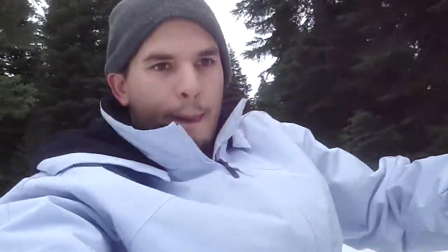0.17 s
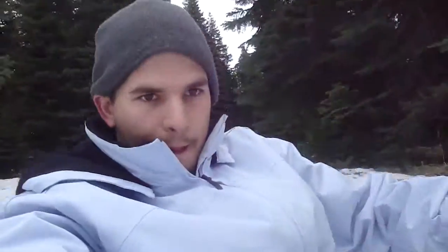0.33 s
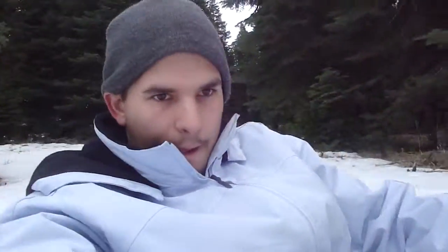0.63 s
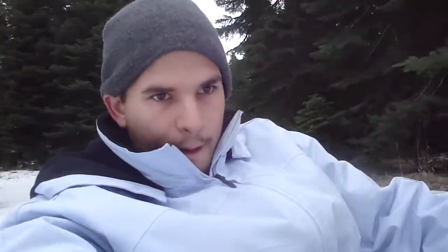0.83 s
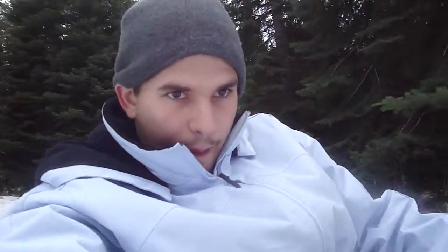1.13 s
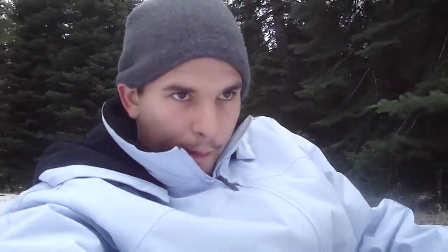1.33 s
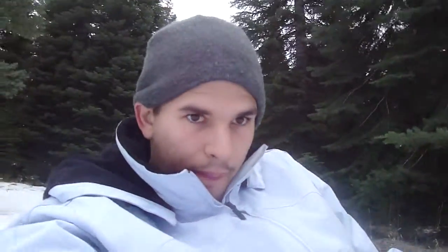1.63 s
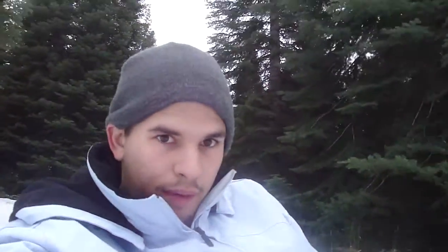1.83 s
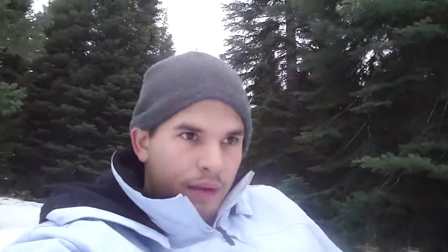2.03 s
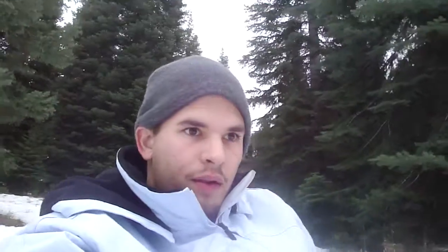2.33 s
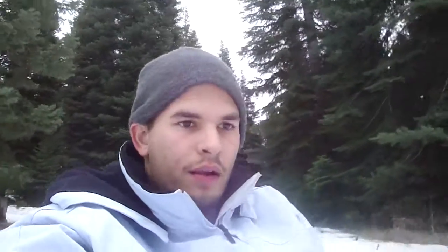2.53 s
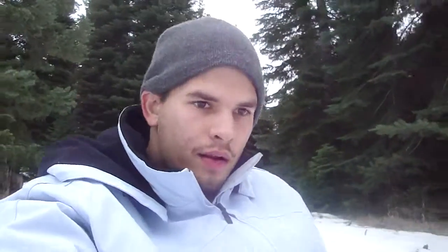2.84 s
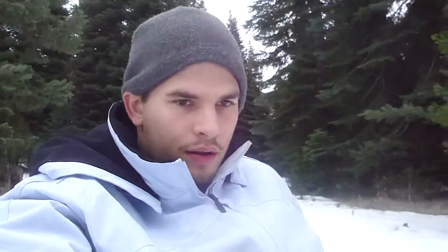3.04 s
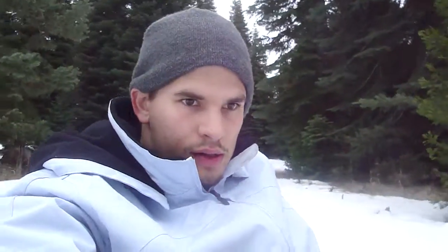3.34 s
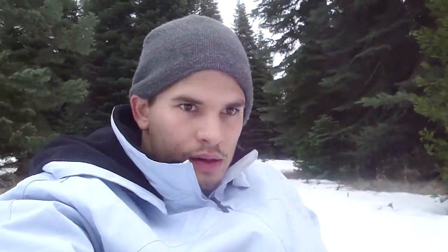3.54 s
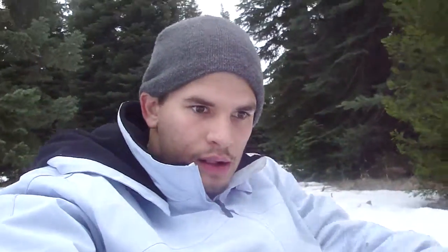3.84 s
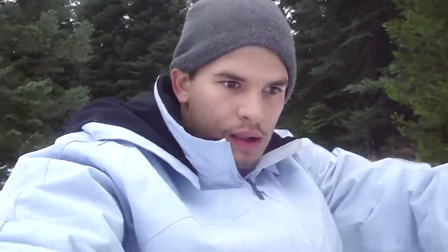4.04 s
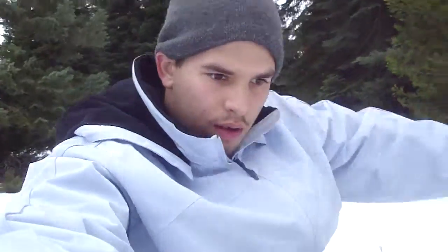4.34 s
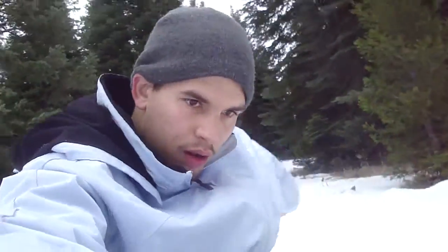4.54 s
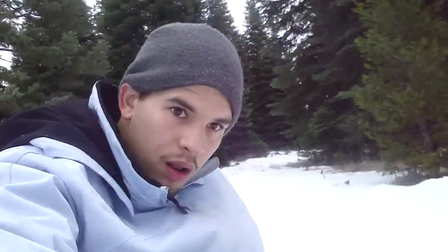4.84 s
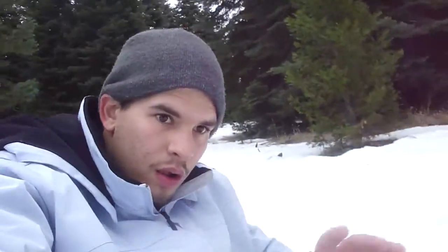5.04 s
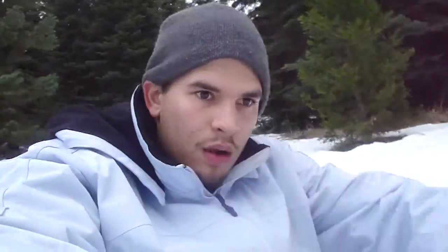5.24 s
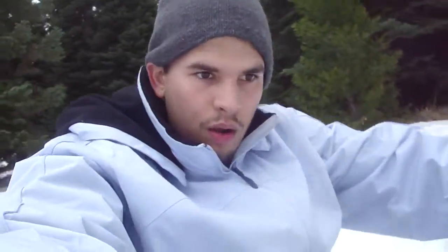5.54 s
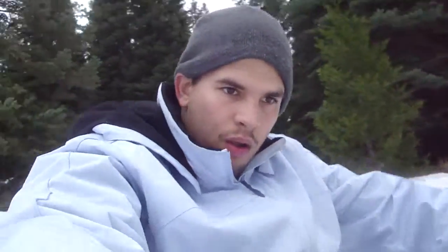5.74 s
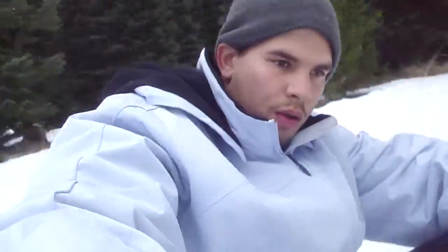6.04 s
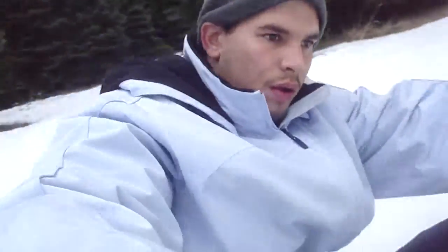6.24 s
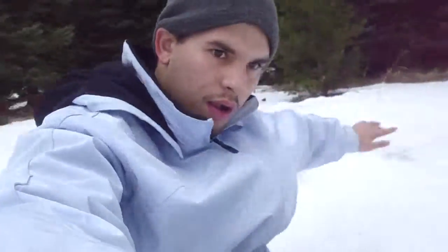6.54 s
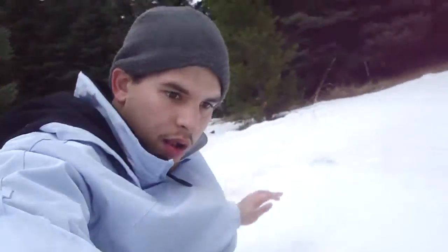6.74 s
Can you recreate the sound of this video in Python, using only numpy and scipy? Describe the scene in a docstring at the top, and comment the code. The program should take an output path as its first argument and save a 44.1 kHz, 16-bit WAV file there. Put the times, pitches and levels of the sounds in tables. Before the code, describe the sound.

A plastic sled runs down a snowy forest track, heard by a small hand-held microphone on board, close, dry and mono. At 0 s the rush is already strong: grainy scrape, hollow hull drone, hissing spray and a heavy wind buffet that eases by 0.5 s. From 0.4 to 1.0 s dull thuds knock in quick succession, hardest near 0.8 and 0.9; another cluster comes at 1.5-1.95. Around 2.2-2.7 the hull crunches lightly, wind lifts and the scrape becomes brighter until about 3.3, then softens. At 4.1-4.25 sharp crunches bite, followed by a hissier surge near 4.5. A firm bump lands at 5.4. From 5.6 the spray brightens unevenly, with crunches and small thuds, peaking in a crisp hiss around 6.2-6.45. Afterwards the scrape turns darker and wind fades, the slide still continuing at 6.87.

```python
"""A plastic sled runs down a snowy forest track, heard by a small hand-held mono microphone on board.
Hull drone, scrape over crushed snow and edge spray: random clicks, band-filtered and coloured.
Head wind: low-frequency click noise in lumpy gusts. Ruts: smooth pushes on the capsule.
Crunches: brief level and tilt changes where the hull bites crust. A limiter ducks the highest peaks."""
import sys
import numpy as np
from scipy import signal
from scipy.fft import rfft, irfft
from scipy.io import wavfile

SR = 44100
rng = np.random.default_rng(int(sys.argv[2]) if len(sys.argv) > 2 else 0)


def to_wav(sig):
    """Store sig (one row per channel, or 1-D mono) as 16-bit WAV at the path in sys.argv[1].

    Samples outside -1..1 are clipped; the rate is SR.
    """
    pcm = np.clip(np.atleast_2d(sig), -1, 1) * 32767
    pcm = np.round(pcm).astype(np.int16)
    wavfile.write(sys.argv[1], SR, pcm.T)  # frames by channels


N = 303170


def from_db(db):
    """Gain of a level in dB."""
    return 10 ** (np.asarray(db) / 20)


def rms_one(x):
    """Scaled to rms 1."""
    return x / np.sqrt(np.mean(x ** 2) + 1e-20)


def in_time(rows):
    """Table columns, interpolated at every sample."""
    s, *columns = np.transpose(rows)
    return [np.interp(np.arange(N) / SR, s, column) for column in columns]


def drift(rate_hz):
    """Slow noise of rms 1: white noise through two equal low-pass poles at rate_hz."""
    step = 40  # samples per slow point
    pole = np.exp(-2 * np.pi * rate_hz * step / SR)
    white = rng.standard_normal(N // step + 2002)
    slow = signal.lfilter([1], [1, -2 * pole, pole * pole], white)[2000:]  # drop the settling
    return np.interp(np.arange(N) / step, np.arange(len(slow)), rms_one(slow))


def crystals(per_s, spread_db):
    """Snow crystals break at random moments, with uneven strength and either sign."""
    size_db = spread_db * np.minimum(rng.exponential(1, N), 5)
    sizes = from_db(size_db) * rng.standard_normal(N)
    return rms_one(sizes * (rng.random(N) < per_s / SR))


RING_WIDTH_OCTAVES = 0.2


def rush(spectrum, surge, per_s, spread_db, surge_db, patchy_db,
         tilt_db=0, pivot_hz=1000, ring_hz=1000, ring_db=0):
    """Random clicks in third-octave bands; all share the surge and each flickers on its own."""
    hz_points, db_points = np.transpose(spectrum)
    span_octaves = np.log2(hz_points[-1] / hz_points[0])
    edges_hz = hz_points[0] * 2 ** np.arange(0, span_octaves + .4, 1 / 3)
    clicks = [crystals(per_s, spread_db) for _ in range(2)]  # neighbouring bands differ
    out = 0
    for k, (low_hz, high_hz) in enumerate(zip(edges_hz, edges_hz[1:])):
        band_pass = signal.butter(2, [low_hz, high_hz], "band", fs=SR, output="sos")
        band = signal.sosfilt(band_pass, clicks[k % 2])
        flicker_db = surge_db * surge + patchy_db * drift(7.6)
        tilt_octaves = np.clip(np.log2(low_hz / pivot_hz), -1, 1)  # flat beyond one octave
        ring_octaves = np.log2(np.sqrt(low_hz * high_hz) / ring_hz)
        ring_gain_db = ring_db * np.exp(-.5 * (ring_octaves / RING_WIDTH_OCTAVES) ** 2)
        out = out + band * from_db(flicker_db + tilt_db * tilt_octaves + ring_gain_db)
    hz = np.maximum(np.arange(N // 2 + 1) * SR / N, 1)
    colour = from_db(np.interp(np.log(hz), np.log(hz_points), db_points))
    return rms_one(irfft(rfft(out) * colour, N))


# hull rings, shifting as it flexes: t/s, low ring f/Hz, low ring boost/dB,
# high ring f/Hz, high ring boost/dB
HULL_RINGS = [(0.0, 300, 4, 1180, 0.5), (0.6, 308, 4, 1100, 4), (0.95, 430, 8.5, 1250, -1),
              (1.5, 430, 1.5, 1300, 0.5), (2.1, 340, 1, 910, 0.5), (2.7, 356, 4.5, 870, 4.5),
              (3.3, 348, -1.5, 810, 5.5), (3.9, 273, 4, 890, 3.5), (4.6, 245, 5, 910, 3.5),
              (5.3, 238, -0.5, 1000, 3), (5.9, 420, 6, 850, 2), (6.4, 300, -4, 800, 4.5),
              (6.87, 400, 2, 800, 0)]


def hull_rings():
    """Two broad hull resonances: frequency and boost in time."""
    return in_time(HULL_RINGS)


# drone colour: f/Hz, level/(dB per Hz)
DRONE_SPECTRUM = [(40, -72), (100, -13.5), (200, -1.5), (290, -2), (400, -3.5), (650, -9.5), (1100, -13)]


def drone(surge):
    """Hull vibration, boosted at the low ring; the shared surge has zero weight."""
    ring_hz, ring_db, _, _ = hull_rings()
    return rush(DRONE_SPECTRUM, surge, 9000, spread_db=1.0, surge_db=0.0, patchy_db=1.0,
                ring_hz=ring_hz, ring_db=ring_db)


# scrape colour: f/Hz, level/(dB per Hz)
SCRAPE_SPECTRUM = [(300, -5), (550, -1), (680, -3), (850, -2.5), (1200, -2), (1650, -2), (2000, -5.5),
                   (2300, -8.5), (2700, -13.5), (3500, -17.5)]


def scrape(surge, tilt_db):
    """Hull over crushed snow: clumps make the bands flicker; boosted at the high ring."""
    _, _, ring_hz, ring_db = hull_rings()
    return rush(SCRAPE_SPECTRUM, surge, 15000, spread_db=1.5, surge_db=-0.09, patchy_db=0.8,
                tilt_db=tilt_db, ring_hz=ring_hz, ring_db=ring_db)


# spray colour: f/Hz, level/(dB per Hz)
SPRAY_SPECTRUM = [(1200, -17), (2200, -3), (2800, -2.5), (3400, -1), (4100, -1.5), (4900, .7), (5700, -1),
                  (6500, -2.5), (7800, -4.4), (9200, -9.3), (10700, -17.5), (13000, -27), (15600, -31)]


def spray(surge, tilt_db):
    """Snow thrown off the hull edges: dense clicks that hiss and follow the surge."""
    return rush(SPRAY_SPECTRUM, surge, 30000, spread_db=1.2, surge_db=.5, patchy_db=.6,
                tilt_db=tilt_db, pivot_hz=4500)


# the ride: t/s, drone level/dB, scrape level/dB, spray level/dB,
# scrape tilt/(dB per octave), spray tilt/(dB per octave)
RIDE_LEVELS = [(0.0, -20.5, -15, -22, -2.5, -2), (0.2, -25.5, -17.5, -25.5, -0.5, -3),
               (0.65, -25, -19.5, -26.5, -3, -6.5), (0.8, -28, -19.5, -28.5, -1, -4.5),
               (0.94, -26, -19.5, -29, -1, -5), (1.13, -24, -19, -30, -1.5, -4),
               (1.5, -24.5, -17.5, -28, -1, -3.5), (2.03, -22.5, -18, -26.5, 0.5, -5),
               (2.18, -22, -16, -25.5, -1, -4), (2.45, -28, -17.5, -27, -0.5, -5),
               (2.72, -25.5, -17.5, -23.5, 3, -3), (3.08, -22.5, -17.5, -23.5, 2.5, -3.5),
               (3.52, -24.5, -20, -28, 0.5, -3.5), (3.71, -25, -20, -26, -1, -3.5),
               (3.88, -25, -23, -27.5, -3, -4), (4.0, -23.5, -19, -26, -1, -2.5),
               (4.18, -23.5, -22, -26.5, -2.5, -3), (4.25, -21.5, -18, -22.5, 0.5, -2),
               (4.38, -24.5, -19, -22, 2.5, -1), (4.51, -27, -16.5, -20, -0.5, -0.5),
               (4.63, -26.5, -18, -22.5, -2, -2), (4.75, -24, -18, -24.5, -1, -4.5),
               (4.92, -26, -19.5, -26, -1.5, -3), (5.2, -21, -19, -25, -2.5, -4.5),
               (5.45, -21.5, -21.5, -25, 2, 0.5), (5.56, -23, -20.5, -24.5, -1, 0),
               (5.63, -22, -19, -23, 1.5, 1.5), (5.72, -24, -20, -21.5, 2.5, 0),
               (5.85, -29.5, -18, -24.5, 0, -1), (6.05, -22.5, -19.5, -23.5, 0.5, -1),
               (6.14, -23.5, -22, -22, -2, -0.5), (6.2, -20.5, -23.5, -21, 3, -1),
               (6.28, -26.5, -23.5, -20, 1, -2.5), (6.37, -23, -23.5, -18, 5, 0.5),
               (6.43, -29, -24.5, -19.5, 1, -0.5), (6.5, -26, -23, -21, 1, -3),
               (6.62, -23.5, -19.5, -26.5, 0, -3.5), (6.87, -28, -18, -24.5, -3.5, -3)]
CRUNCH_SHARE_IN_SPRAY = .62  # of the swell in dB


def sled():
    """Drone, scrape and spray at ride levels; crunches move scrape and spray."""
    drone_db, scrape_db, spray_db, scrape_tilt_db, spray_tilt_db = in_time(RIDE_LEVELS)
    surge = drift(9.2)
    bite_db, bite_tilt_db = crunches()
    hull_drone = from_db(drone_db) * drone(surge)
    snow_scrape = from_db(scrape_db + bite_db) * scrape(surge, scrape_tilt_db + bite_tilt_db)
    edge_spray = from_db(spray_db + CRUNCH_SHARE_IN_SPRAY * bite_db) * spray(surge, spray_tilt_db)
    return hull_drone + snow_scrape + edge_spray


# strength of head wind and small jolts: t/s, offset/dB
GUST_STRENGTH = [(0, 11.5), (0.5, -5), (1.1, -2.5), (2.0, -1), (2.5, 4), (3.0, 2.5), (3.6, -1), (4.2, 1),
                 (4.7, 4), (5.3, 1), (5.8, 1), (6.3, -1), (6.6, -5), (6.87, -16)]


def gust_db():
    """Offset of head wind and small jolts in time, dB."""
    return in_time(GUST_STRENGTH)[0]


# wind colour: f/Hz, level/(dB per Hz)
WIND_SPECTRUM = [(20, 16), (50, -32), (100, -12), (180, -20.5)]
WIND_DB = -24.5  # at zero gust offset


def wind():
    """Head wind rumbles on the microphone port in lumpy gusts."""
    rumble = rush(WIND_SPECTRUM, drift(21), 4000, spread_db=3.5, surge_db=0.5, patchy_db=2.0)
    return from_db(WIND_DB + gust_db()) * rumble


# ruts felt at the microphone: t/s, push level/dB before the limiter
RUT_JOLTS = [(0.398, -6), (0.44, -4), (0.472, -6), (0.504, -8), (0.575, -9), (0.606, -4), (0.638, -6),
             (0.69, -1), (0.734, -5), (0.775, -3.5), (0.83, 1), (0.928, 1), (0.992, -9), (1.475, -9),
             (1.555, -6), (1.62, -8), (1.67, -7), (1.765, -1), (1.798, .5), (1.83, -4), (1.899, -7),
             (1.948, -5), (2.5, -5), (2.554, -9), (3.737, -7), (3.799, -9), (4.04, -8), (4.151, -7),
             (5.4, -2.5), (5.533, -6), (5.912, -12), (5.982, -8), (6.034, -7), (6.147, -4), (6.64, -10)]
# sharp, usual and blunt pushes: share of JOLT_WIDTH_S
JOLT_WIDTH_SHARES = (.8, 1, 1.2)
JOLT_WIDTH_S = .00105  # Gaussian sigma
SMALL_JOLTS_PER_S, SMALL_JOLT_DB, SMALL_JOLT_SPREAD_DB = 45, -20.5, 1.8


def jolts():
    """Each rut is one Gaussian push on the capsule, width by chance; small ones come at random."""
    small = rng.random(N) < SMALL_JOLTS_PER_S / SR
    small_db = SMALL_JOLT_DB + gust_db() + SMALL_JOLT_SPREAD_DB * rng.standard_normal(N)
    pushes = small * from_db(small_db)
    for s, db in RUT_JOLTS:
        pushes[round(s * SR)] = from_db(db)
    t = np.arange(-400, 401) / SR
    dealt = rng.integers(0, len(JOLT_WIDTH_SHARES), N)
    out = np.zeros(N)
    for k, share in enumerate(JOLT_WIDTH_SHARES):
        shape = np.exp(-.5 * (t / (share * JOLT_WIDTH_S)) ** 2)
        out += np.convolve(pushes * (dealt == k), shape, "same")
    return out


# hull bites into crusty snow: t/s, swell level/dB, added scrape tilt/(dB per octave)
CRUST_BITES = [(0.13, 3, 1), (0.21, 2.5, 0.5), (0.255, -1, 0), (0.605, 2.5, -2), (1.145, 2, 1.5),
               (2.15, -0.5, -0.5), (2.24, 0.5, -1.5), (2.31, 1, 0.5), (2.44, 2.5, -1.5), (2.65, 3, -1),
               (3.33, 1, -2), (3.751, 1.5, -1), (3.95, 2, -1), (4.105, 5.5, 2.5), (4.15, 4, 0),
               (4.215, 3.5, 0), (4.255, 0.5, 2.5), (4.32, 0, -3), (4.42, 2.5, 0.5), (4.66, 0.5, 2),
               (4.725, 2.5, 2), (4.855, 2, 1), (5.64, 1.5, 0.5), (5.71, 2, -1), (5.985, 1.5, -2),
               (6.105, 2, 1), (6.15, 3.5, 2), (6.245, 5, -2), (6.3, 2.5, -1), (6.39, 2, 1), (6.77, 1.5, 1)]
CRUNCH_WIDTH_S = .015  # Gaussian sigma


def crunches():
    """Each bite is a brief smooth change of level/dB and scrape tilt/(dB per octave)."""
    t = np.arange(N) / SR
    out = np.zeros((2, N))
    for s, db, tilt_db in CRUST_BITES:
        swell = np.exp(-.5 * ((t - s) / CRUNCH_WIDTH_S) ** 2)
        out += np.outer([db, tilt_db], swell)
    return out


def scene():
    """One capsule feeds both channels."""
    return np.tile(sled() + wind() + jolts(), (2, 1))


LIMIT_DB, LIMIT_SHARE = -2, .65  # share of the excess taken off
EXCESS_RELEASE_DB_PER_S, ATTACK_S = 28, .003  # release before the share is taken
LOW_CUT_HZ, RUMBLE_CUT_HZ, TOP_CUT_HZ = 205, 125, 15644


def record(dry):
    """Slow-release limiter, then low cuts that turn each push into a short thud, then a top cut."""
    over_db = np.maximum(20 * np.log10(np.abs(dry) + 1e-9) - LIMIT_DB, 0)
    ramp_db = EXCESS_RELEASE_DB_PER_S * np.arange(N) / SR
    held_db = np.maximum.accumulate(over_db + ramp_db, axis=1) - ramp_db
    pole = np.exp(-1 / (ATTACK_S * SR))
    duck_db = signal.lfilter([1 - pole], [1, -pole], LIMIT_SHARE * held_db)
    out = dry * from_db(-duck_db)
    for cut_hz in (LOW_CUT_HZ, RUMBLE_CUT_HZ):
        out = signal.sosfilt(signal.butter(2, cut_hz, "high", fs=SR, output="sos"), out)
    return signal.sosfilt(signal.ellip(10, .5, 70, TOP_CUT_HZ, fs=SR, output="sos"), out)


dry = scene()
out = record(dry)
to_wav(out)
```